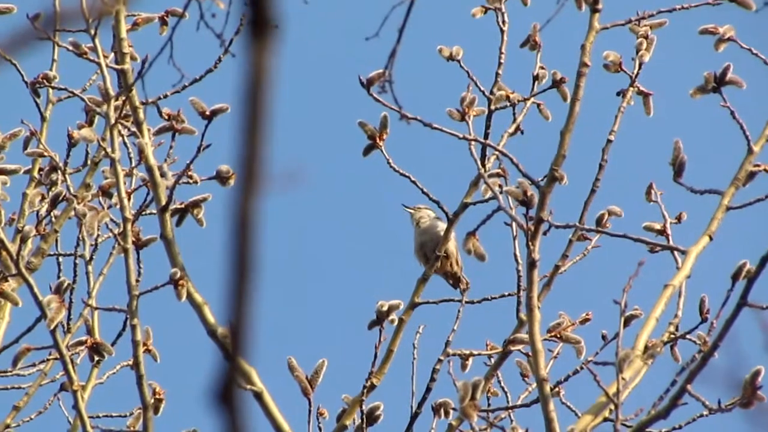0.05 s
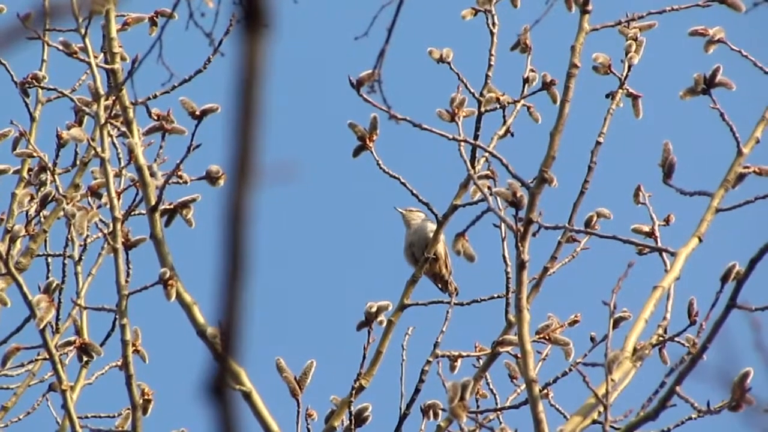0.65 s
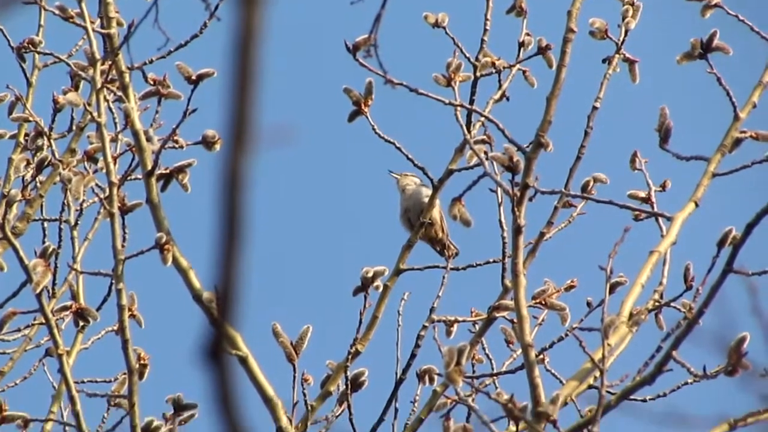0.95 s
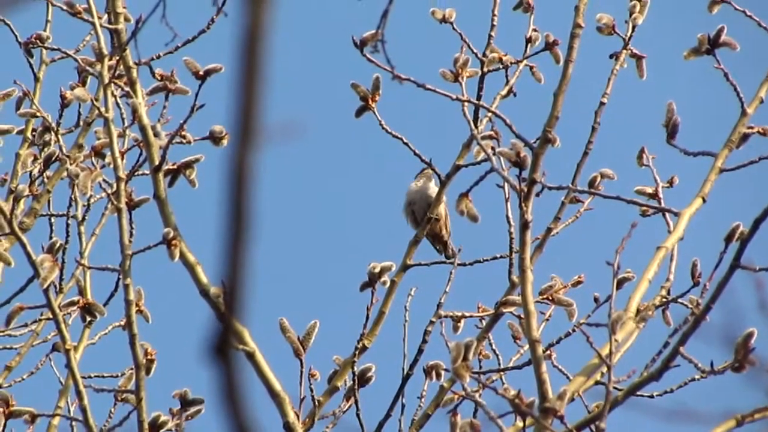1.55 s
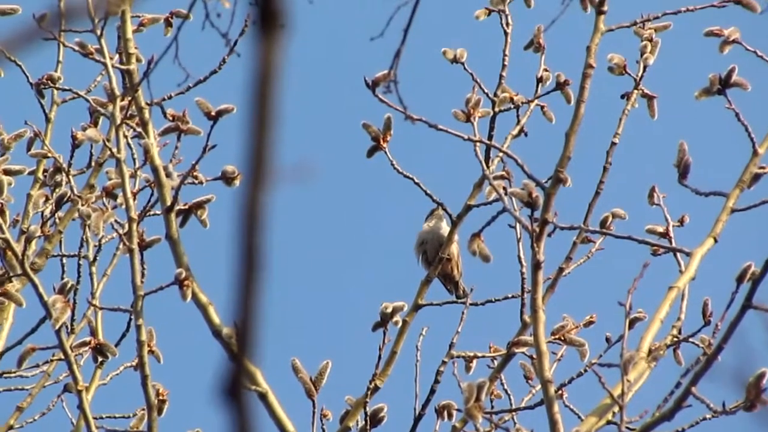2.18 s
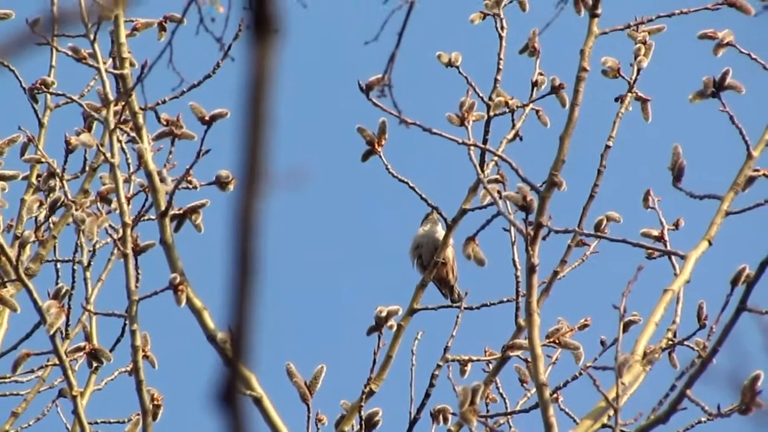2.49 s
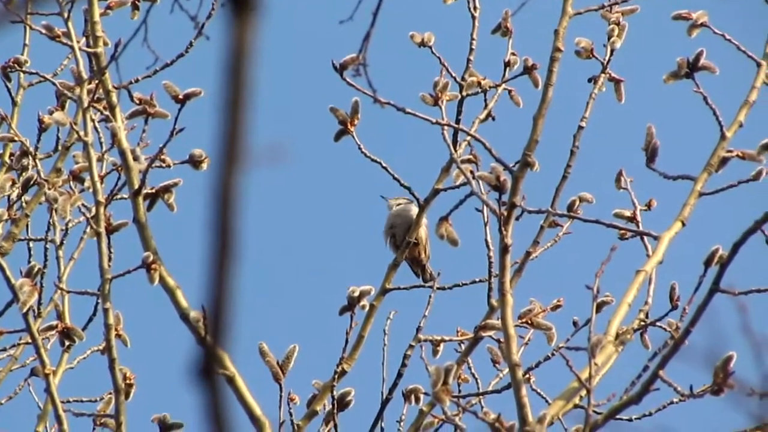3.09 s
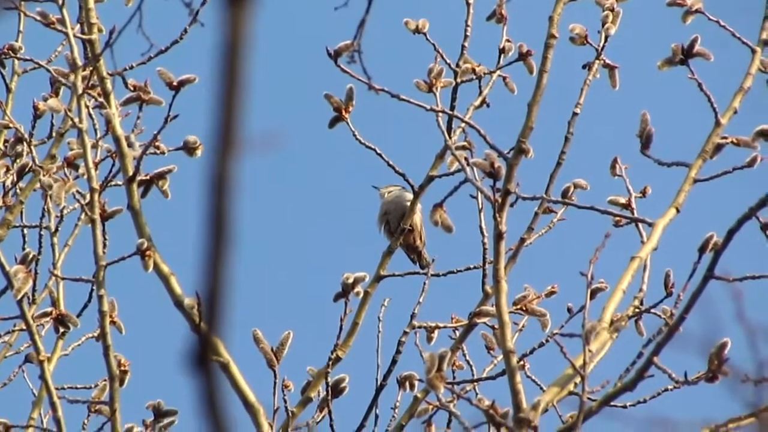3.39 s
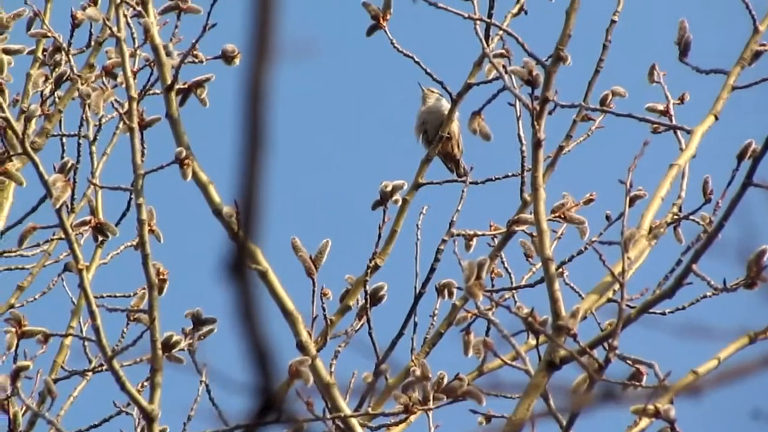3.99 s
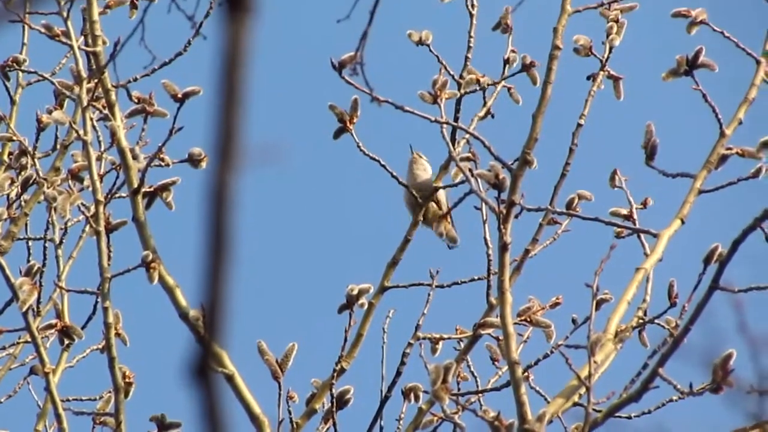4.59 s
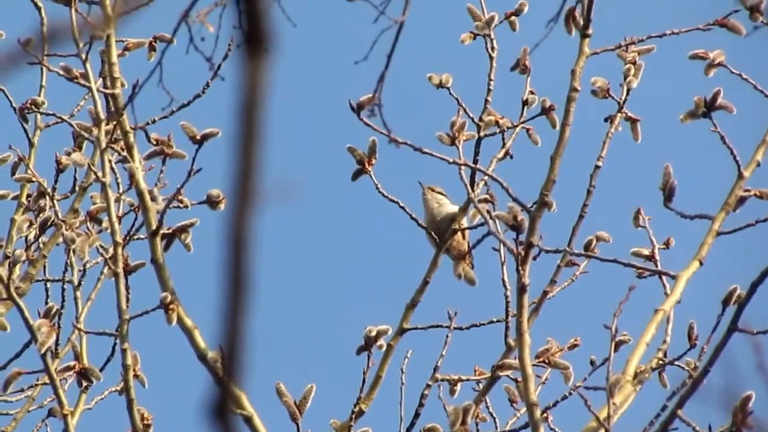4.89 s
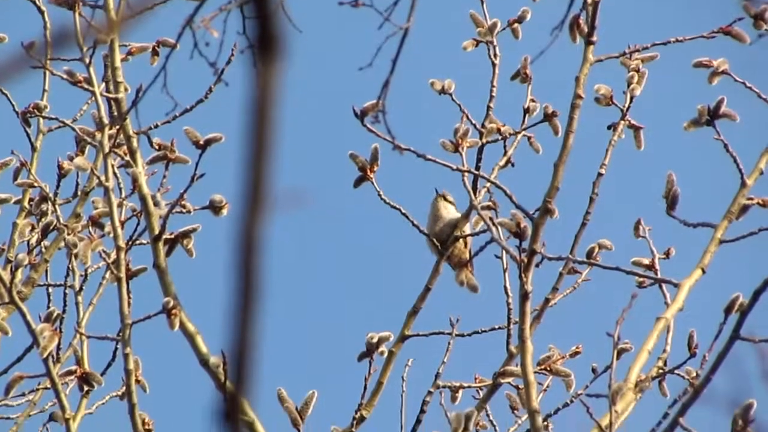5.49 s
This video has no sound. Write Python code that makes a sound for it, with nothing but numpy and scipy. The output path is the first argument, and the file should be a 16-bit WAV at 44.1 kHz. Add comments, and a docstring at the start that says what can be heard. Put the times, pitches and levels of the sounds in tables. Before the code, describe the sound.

In quiet woods, two nearly pure, falling nuthatch whistles sound from a treetop, with a quick run of high notes from a smaller bird behind them. Then a dog farther away gives six short, raspy barks at uneven intervals. Faint chirps and thin calls continue on both sides. The stereo microphone stays in one place, picking up a steady distant hum and a gentle forest echo.

```python
"""Nuthatch in still woods

A nuthatch gives two long falling whistles from a treetop, each a nearly pure sliding tone.
Further off a dog barks six times, a rough buzz ringing through its throat and mouth.
Small birds chirp all around in short gliding notes.
Trunks and branches scatter every call over a soft, distant outdoor hum."""
import sys
import numpy as np
from scipy import signal
from scipy.fft import rfft, irfft
from scipy.io import wavfile
from scipy.ndimage import uniform_filter1d

SR = 44100
rng = np.random.default_rng(int(sys.argv[2]) if len(sys.argv) > 2 else 0)


def store_wav(level_fs):
    """Save 16-bit WAV to argv[1]."""
    pcm = np.round(np.clip(np.atleast_2d(level_fs), -1, 1) * 32767)
    wavfile.write(sys.argv[1], SR, pcm.T.astype(np.int16))


N = 249165


def gain_of(db):
    """Decibels to amplitude."""
    return 10 ** (np.asarray(db) / 20)


def unit_rms(x):
    """Scales to rms 1."""
    return x / np.sqrt(np.mean(x ** 2) + 1e-20)


def curve_at(points, hz):
    """Reads a spectrum on a log-frequency axis."""
    f, value = np.transpose(points)
    return np.interp(np.log(hz + 1), np.log(f + 1), value)


def follow(rows, at):
    """Joins each column of a curve by straight lines."""
    position, *columns = np.transpose(rows)
    return [np.interp(at, position, column) for column in columns]


def add(mix, start_s, sound):
    """Mixes a sound in at its start time."""
    part = mix[..., max(round(start_s * SR), 0):][..., :sound.shape[-1]]
    part += sound[..., :part.shape[-1]]


def wander(size, hz):
    """Random drift of rms about 1, rolled off above hz."""
    f = np.fft.rfftfreq(2 ** 15, 1 / SR)
    return unit_rms(irfft(rfft(rng.standard_normal(2 ** 15)) * np.exp(-(f / hz) ** 2)))[:size]


def pan(balance_db):
    """Left and right gains; a positive balance leans left."""
    return gain_of(np.array([[.5], [-.5]]) * balance_db)


# Tone of the hum. Each row: frequency in Hz, relative level in dB.
HUM_SPECTRUM = [(15, -33), (25, -59), (64, -3), (136, -11), (246, -2.5), (537, -1.5), (614, -3), (919, 0.5),
                (1140, -2.5), (1530, -11), (2120, -14.5), (2770, -12.5), (5580, -23), (12800, -31),
                (15500, -38.5)]
# Lean of the hum. Each row: frequency in Hz, left over right in dB.
HUM_BALANCE = [(60, -2.5), (180, -1.5), (550, 1), (1650, -1), (4970, -1), (15000, 1)]
# Width of the hum and of the forest tail. Each row: frequency in Hz, left-right likeness from 0 to 1.
EAR_LIKENESS = [(60, 0.89), (150, 0.87), (380, 0.91), (950, 0.84), (2380, 0.3), (5980, 0.043),
                (15000, 0.01)]


def distant_hum(level_db=-48, patchy_db=1.78):
    """The outdoor bed: dark noise drifting in soft patches, wide in the treble."""
    frames, hz = N // 512 + 5, np.fft.rfftfreq(2048, 1 / SR)
    a, b, c, d, patches = rng.standard_normal((5, frames, len(hz)))
    patches = uniform_filter1d(patches, size=14, axis=0)
    patches = unit_rms(uniform_filter1d(patches, size=16, axis=1))
    likeness = curve_at(EAR_LIKENESS, hz)
    left = a + 1j * b
    right = likeness * left + np.sqrt(1 - likeness ** 2) * (c + 1j * d)
    colour = gain_of(curve_at(HUM_SPECTRUM, hz) + patchy_db * patches)
    spectra = np.array([left, right]) * colour * pan(curve_at(HUM_BALANCE, hz))[:, None]
    hum = signal.istft(spectra.transpose(0, 2, 1), nperseg=2048, noverlap=1536)[1]
    return gain_of(level_db) * unit_rms(hum[:, :N])


# Decay of the forest. Each row: frequency in Hz, seconds to fade by 60 dB.
FOREST_DECAY = [(300, 1.8), (600, 2.8), (1600, 2.53), (2600, 0.57), (4500, 1.64), (8000, 0.083)]


def forest_tail(x, onset_s=0.0068):
    """The long tail from far trees; the top treble dies first, and bass is alike in both ears."""
    hz, t, (left, other) = signal.stft(rng.standard_normal((2, 2 * SR)), SR, nperseg=256)
    likeness = curve_at(EAR_LIKENESS, hz)[:, None]
    right = likeness * left + np.sqrt(1 - likeness ** 2) * other
    t60 = curve_at(FOREST_DECAY, hz)[:, None]
    envelope = gain_of(-60 * t / t60) * (1 - np.exp(-t / onset_s))
    tail = signal.istft(np.array([left, right]) * envelope, SR, nperseg=256)[1]
    return signal.fftconvolve(x, tail / np.linalg.norm(tail[0]), axes=1)[:, :N]


def branch_echoes(x, fade_s, first_s, echoes_per_s=1500):
    """Sparse early echoes from nearby branches and trunks, different at each ear."""
    t = np.arange(SR // 2) / SR
    taps = rng.standard_normal((2, len(t))) * (rng.random((2, len(t))) < echoes_per_s / SR)
    taps *= np.exp(-t / fade_s) * (t > first_s)
    return signal.fftconvolve(x, taps / np.linalg.norm(taps, axis=1, keepdims=True), axes=1)[:, :N]


def far_chorus(level_db=-60, count=90, growth_db=5, tail_db=-2):
    """Many birds, so far off that only their echoes arrive; they grow louder toward the end."""
    calls = np.zeros((1, N))
    for k, (slot, pitch, glide, span) in enumerate(rng.random((count, 4))):
        when = (k + slot) / count
        length_s = 0.0279 + 0.06 * span
        progress = np.arange(0, 1, 1 / (length_s * SR))
        hz = (2500 + 1950 * pitch) * (1 + 0.6 * (glide - .4) * (progress - .5))
        chirp = np.sin(2 * np.pi * np.cumsum(hz) / SR) * np.sin(np.pi * progress)
        add(calls, when * N / SR, gain_of(growth_db * when) * chirp)
    echoes = branch_echoes(calls, fade_s=0.074, first_s=0)
    return gain_of(level_db) * unit_rms(echoes + gain_of(tail_db) * forest_tail(calls))


# Songs, each one syllable repeated evenly. Each row: start in seconds, syllable, count, period and note
# length in seconds, first and last pitch in Hz, top level in dB, loudest point as a share of the song,
# swell in dB per song length, rasp from 0 to 1, left over right in dB.
SMALL_SONGS = [(.29, "dip", 6, .129, .04, 5350, 5000, -40.5, .9, 21, .12, 4),
               (.308, "fall", 6, .134, .046, 6550, 6050, -50, .75, 12, .8, 2.5),
               (1.714, "pipe", 2, .185, .085, 2690, 2700, -54.5, 1, 6, .12, -2),
               (2.09, "hook", 3, .18, .088, 7100, 6300, -63, .7, 4, .02, 2.5),
               (3.654, "pipe", 2, .108, .072, 4713, 4774, -46.5, 0, 5, .02, -2),
               (3.992, "slur", 8, .157, .044, 4980, 5470, -52.5, .55, 12, .09, 2.5),
               (4.25, "fall", 3, .236, .055, 2720, 2810, -56, 1, 6, .22, -1)]
# Single calls. Each row: start in seconds, syllable, length in seconds, pitch in Hz, level in dB,
# left over right in dB.
SINGLE_CALLS = [(0.051, "slur", 0.078, 2090, -54.5, -2), (0.179, "pipe", 0.13, 1926, -58.5, -1.5),
                (1.564, "pipe", 0.19, 7270, -70.5, -4.5), (1.769, "pipe", .097, 1959, -56, -1.5),
                (2.108, "slur", .071, 2650, -57, -8), (2.474, "pipe", 0.085, 3360, -54.5, -2.5),
                (2.754, "pipe", 0.077, 3080, -56.5, -3), (2.78, "pipe", .065, 8170, -72, 1),
                (2.998, "rise", 0.047, 4156, -53, 3), (3.12, "pipe", .044, 3265, -53.5, 3),
                (3.207, "rise", 0.037, 4030, -51, -3), (3.266, "pipe", 0.16, 4280, -60, -4),
                (3.371, "seep", .12, 7350, -52, -3.5), (3.409, "rise", .038, 3770, -54, -3.5),
                (3.854, "rise", .041, 3245, -52.5, -3), (3.957, "rise", .09, 3830, -54, -3),
                (4.072, "pipe", 0.13, 4280, -59.5, 1.5), (4.327, "seep", .074, 6880, -59, 5.5),
                (4.592, "rise", .033, 2750, -51.5, -2.5), (4.963, "tsit", .053, 8054, -42.5, -3),
                (5.077, "pipe", 0.039, 2425, -53.5, -3), (5.231, "rise", .052, 3175, -62, -10.5),
                (5.309, "rise", .034, 4160, -55, 3), (5.413, "fall", 0.071, 4030, -55, -2.5),
                (5.529, "rise", 0.053, 4110, -52, 3)]
# Grit of the single calls. Each entry: syllable, rasp from 0 to 1.
CALL_RASP = {"slur": 0.35, "pipe": .13, "rise": .2, "seep": 0.14, "tsit": 0.034, "fall": 0.286}


def small_bird_notes():
    """Cues every note: songs swell and shift in pitch, single calls stand alone."""
    for (start, syllable, count, period, length, first_hz, last_hz,
         top_db, loudest, swell_db, rasp, balance_db) in SMALL_SONGS:
        for k, progress in enumerate(np.linspace(0, 1, round(count))):
            pitch_hz = first_hz + progress * (last_hz - first_hz)
            db = top_db - swell_db * abs(progress - loudest)
            yield start + k * period, syllable, length, pitch_hz, db, rasp, balance_db
    for start, syllable, length, pitch_hz, db, balance_db in SINGLE_CALLS:
        yield start, syllable, length, pitch_hz, db, CALL_RASP[syllable], balance_db


# Gesture of each named syllable. Each row: share of its length, pitch factor, level in dB.
SYLLABLE_SHAPES = { "dip": [(0, 1.1, -8), (.25, 1.01, -1), (.5, .92, 0), (.7, 1.02, 1), (1, 1.05, -7)],
                   "fall": [(0, 1.1, -10), (.3, 1.03, 0), (.7, .965, 0), (1, .93, -6)],
                   "slur": [(0, 1.06, -8), (.3, 1.025, 0), (.7, .975, 0), (1, .935, -6)],
                   "seep": [(0, 1.09, -12), (.3, 1.025, -2), (.55, .98, 0), (.8, .955, 0), (1, .945, -5)],
                   "hook": [(0, 1.06, -8), (.25, 1.02, -1), (.68, .97, 0), (.85, .87, 0), (1, .76, -5)],
                   "rise": [(0, .75, -6), (.25, .85, 0), (.55, 1.04, -1), (1, 1.1, -2)],
                   "pipe": [(0, .985, -8), (.2, 1, 0), (.7, 1.003, 0), (1, 1, -5)], "tsit": [(0, .84, -15),
                   (.17, 1.01, -1), (.26, 1.03, 3), (.5, .96, 2), (.75, 1.005, 3), (1, 1.025, -3)]}


def small_birds(near_db=-48, echo_slope=0.29, lead_rad_per_db=0.59):
    """Short pure syllables, some rasping; the fainter a bird, the more of it arrives as echo."""
    direct, send = np.zeros((2, 2, N))
    for start, syllable, length, pitch_hz, db, rasp, balance_db in small_bird_notes():
        progress = np.arange(0, 1, 1 / (length * SR))
        size = len(progress)
        bend, swell_db = follow(SYLLABLE_SHAPES[syllable], progress)
        flutter = (0.00068 + 0.111 * rasp) * wander(size, 396)
        hz = pitch_hz * uniform_filter1d(bend, size=130) * (1 + flutter)
        lead = np.array([[.5], [-.5]]) * lead_rad_per_db * balance_db  # the louder side hears it first
        tone = np.sin(2 * np.pi * np.cumsum(hz) / SR + lead) * signal.windows.tukey(size, .15)
        note = np.sqrt(2) * gain_of(db + swell_db) * tone * pan(balance_db)
        distance_db = echo_slope * (near_db - db)
        add(direct, start, note * gain_of(-.5 * distance_db))
        add(send, start, note * gain_of(distance_db))
    tail = gain_of(-13) * forest_tail(send)
    echoes = gain_of(-2) * branch_echoes(send, fade_s=0.065, first_s=0.01)
    return gain_of(3) * direct + echoes + tail


# The lowest resonance of the dog's throat: centre in Hz, width in Hz.
CHEST_RESONANCE = (520, 190)
# Resonances above the chest. Each row: centre in Hz, width in Hz, level in dB.
THROAT_RESONANCES = [(848, 115, 4), (1089, 270, -2), (1343, 174, 0)]
# The top resonance, tuned by the mouth for each bark: width in Hz, level in dB.
MOUTH_RESONANCE = (188, 0)


def resonate(x, hz, width_hz):
    """A steep resonance of gain 1."""
    b, a = signal.iirpeak(hz, hz / width_hz, SR)
    return signal.lfilter(b, a, signal.lfilter(b, a, x))


def dog_throat(buzz, mouth_hz, opening_db):
    """Chest, throat and mouth ring with the buzz; an open jaw lets out more of the upper resonances."""
    resonances = THROAT_RESONANCES + [(mouth_hz, *MOUTH_RESONANCE)]
    upper = sum(gain_of(db) * resonate(buzz, hz, width) for hz, width, db in resonances)
    return resonate(buzz, *CHEST_RESONANCE) + gain_of(opening_db) * upper


# The barks. Each row: start and length in seconds, top pitch in Hz, level in dB, roughness from 0 to 1,
# mouth opening in dB on the upper throat, mouth resonance in Hz, depth of the pitch arch.
DOG_BARKS = [(2.339, 0.17, 552.3, -27, 0.65, -2, 1717, 0.86), (2.589, 0.2, 497, -33, 0.62, -6, 1452, 1),
             (2.867, 0.15, 434, -37, 0.14, -14.5, 1250, 0.406),
             (3.346, 0.15, 531.8, -29, 0.56, -3.5, 1454, 0.79),
             (4.595, .195, 571.1, -27, 0.81, -0.5, 1640, 0.98),
             (5.001, 0.17, 548.8, -27.5, 0.63, 0, 1593, 0.91)]
# Gesture of one bark. Each row: share of its length, pitch factor, effort in dB, roughness factor,
# jaw opening in dB on the upper throat.
BARK_SHAPE = [(0, 0.596, -7.5, 0.36, 0), (.12, .77, 0.5, 0.24, -14.5), (.26, .92, 1, 0.17, -4),
              (.42, 1.01, -1, 0.65, -2.5), (.56, .98, -2, 1.28, -1), (.75, .95, -8.5, 1, 0),
              (.9, .93, -7.5, 0.98, 1.5), (1, 0.82, -7.5, 1.2, 4.5)]


def dog(jitter=0.074, shimmer=0.86, lead_rad=0.71, dull_above_hz=1890):
    """Each bark rises as a clean note, then breaks into period doubling and rasp as the jaw opens."""
    barks = np.zeros(N)
    distance_filter = signal.butter(6, dull_above_hz, fs=SR, output="sos")
    for start, length, pitch_hz, db, roughness, mouth_db, mouth_hz, arch in DOG_BARKS:
        progress = np.arange(0, 1, 1 / (length * SR))
        size = len(progress)
        bend, effort_db, breaking, jaw_db = follow(BARK_SHAPE, progress)
        rough = roughness * breaking
        hz = pitch_hz * bend ** arch * (1 + jitter * rough * wander(size, 219))
        cycles = np.cumsum(hz) / SR
        folds = sum(np.cos(2 * np.pi * k * cycles) for k in range(1, 6))
        doubling = sum(np.cos(2 * np.pi * (k + .5) * cycles) / k for k in range(1, 4))
        puffs = unit_rms(2.7 + np.exp(-(cycles / 2 % 1) / 0.66)) * wander(size, 3400)
        uneven = 1 + shimmer * rough * wander(size, 450)  # no two cycles are equally strong
        buzz = (folds + rough * doubling) * uneven + 2 * rough * puffs
        voice = signal.sosfilt(distance_filter, dog_throat(buzz, mouth_hz, mouth_db + jaw_db))
        add(barks, start, gain_of(db + effort_db) * unit_rms(voice) * signal.windows.tukey(size, .14))
    near = barks + gain_of(-9) * branch_echoes(barks[None], fade_s=.04, first_s=.012)[0]
    # the dog is off to the right, so that side is louder and leads in phase
    phase_shift = np.exp(.5j * lead_rad * np.array([[-1], [1]]))
    placed = (signal.hilbert(near) * phase_shift).real * pan(-4)
    echoes = branch_echoes(barks[None], fade_s=.1, first_s=.02)
    return placed + gain_of(-13) * (echoes + forest_tail(barks * pan(-0.63)))


# The nuthatch's throat is tuned to the middle of the slide, so loudness follows pitch.
# Each row: pitch in Hz, level in dB.
THROAT_TUNING = [(2000, -27), (2320, -7.5), (2430, -7), (2560, -2), (2780, 0), (3100, -1.5), (3500, -5),
                 (4200, -14), (4700, -21.5)]


def whistle_gesture(length, drop_s, lead_s, lead_hz):
    """Time from the top, pitch and level of one whistle: lead-in, flick, quick drop, slow slide, hook."""
    lead_db, flick_s, flick_db = -16.5, .012, -3  # the voice almost breaks while it flicks up
    top_hz, slide_hz, sag_hz_per_s, drop_shape = 4800, 3143, 2250, 1.4
    hook_s, hook_hz = 0.014, 333  # the pitch hooks down as the beak closes
    t = np.arange(-lead_s, length, 1 / SR)
    after_top = np.maximum(t, 0)
    drop = (top_hz - slide_hz) * np.exp(-(after_top / drop_s) ** drop_shape)
    hook = hook_hz * np.clip(1 - (length - t) / hook_s, 0, 1)
    falling_hz = slide_hz - sag_hz_per_s * after_top + drop - hook
    flick = np.clip(1 + t / flick_s, 0, 1)
    throat_db = curve_at(THROAT_TUNING, falling_hz)
    level_db = lead_db + flick * (throat_db - lead_db) + flick_db * np.sin(np.pi * flick)
    return t, lead_hz + flick * (falling_hz - lead_hz), level_db


# The two whistles. Each row: time of the top of the flick, slide length, drop time and lead-in length,
# all in seconds, then lead-in pitch in Hz, level in dB.
NUTHATCH_WHISTLES = [(.068, .372, .033, .03, 2780, -29), (.902, 0.37, .022, .04, 2560, -28.5)]
# Their overtones, with faint half orders. Each row: multiple of the pitch, level in dB.
WHISTLE_OVERTONES = [(2, -49), (3, -45), (3.5, -50), (4, -40), (4.5, -48), (5, -38), (5.5, -47)]


def nuthatch(drift=0.0051, waver=0.0036, rasp=0.025, flicker_db=2.5, reedy_db=13, settle_s=0.094):
    """A nearly pure whistle that flicks up, drops fast and then slides down; its overtones flicker."""
    whistles = np.zeros(N)
    for top_s, length, drop_s, lead_s, lead_hz, top_db in NUTHATCH_WHISTLES:
        t, hz, level_db = whistle_gesture(length, drop_s, lead_s, lead_hz)
        size = len(t)
        unsettled = np.exp(-((t - t[0]) / settle_s) ** 2)  # reedy and raspy until the tone settles
        wobble = drift * wander(size, 14) + waver * wander(size, 79)
        grit = rasp * unsettled * wander(size, 600)
        hz = uniform_filter1d(hz, size=160) * (1 + wobble + grit)
        phase = 2 * np.pi * np.cumsum(hz) / SR
        overtones = np.zeros(size)
        for multiple, db in WHISTLE_OVERTONES:
            strength = gain_of(db + flicker_db * wander(size, 29.6))
            overtones += strength * np.sin(multiple * phase) * (multiple * hz < SR / 2)
        tone = np.sin(phase) + gain_of(reedy_db * unsettled) * overtones
        envelope = np.sqrt(2) * gain_of(top_db + level_db) * signal.windows.tukey(size, .03)
        add(whistles, top_s - lead_s, envelope * tone)
    direct = gain_of(-2) * whistles * pan(-6)
    send = whistles * pan(-3)
    echoes = gain_of(-6) * branch_echoes(send, fade_s=0.022, first_s=.004)
    return direct + echoes + gain_of(-11.5) * forest_tail(send)


def scene():
    """Birds and dog over the distant hum."""
    return nuthatch() + small_birds() + far_chorus() + dog() + distant_hum()


def record(dry, cutoff_hz=15720):
    """A steep low-pass trims the very top of the mix."""
    lowpass = signal.firwin(511, cutoff_hz, window=("kaiser", 9), fs=SR)
    return signal.oaconvolve(dry, lowpass[None], "same")


dry = scene()
out = record(dry)
store_wav(out)
```